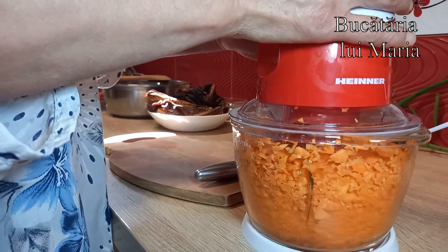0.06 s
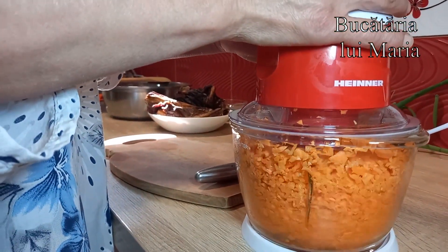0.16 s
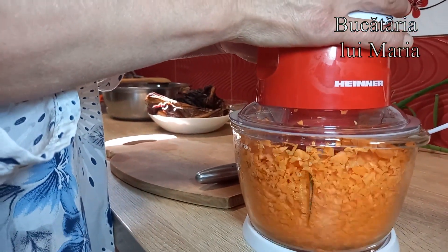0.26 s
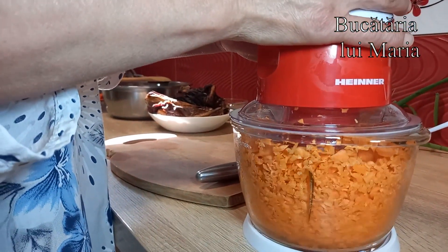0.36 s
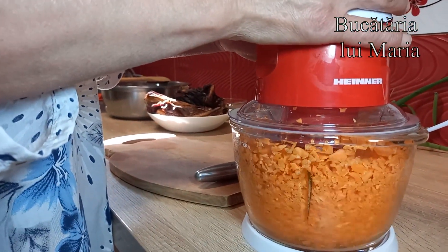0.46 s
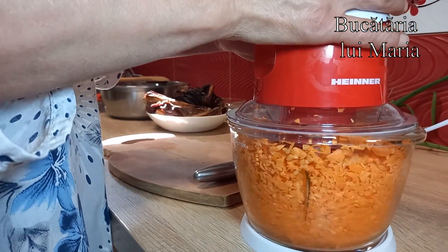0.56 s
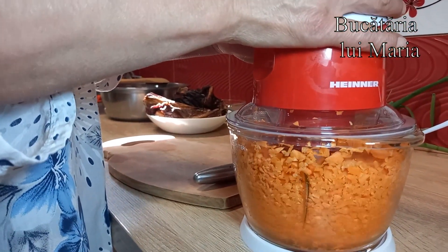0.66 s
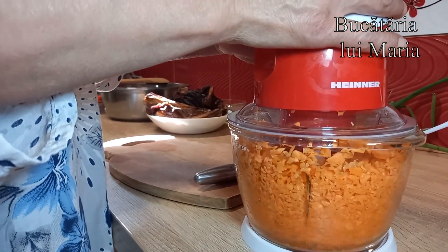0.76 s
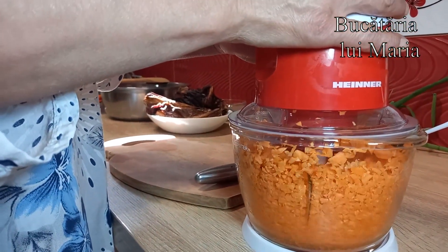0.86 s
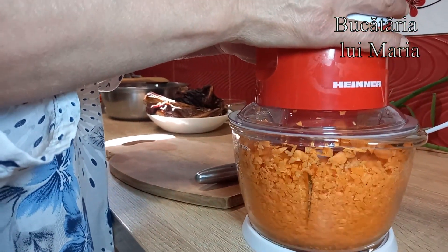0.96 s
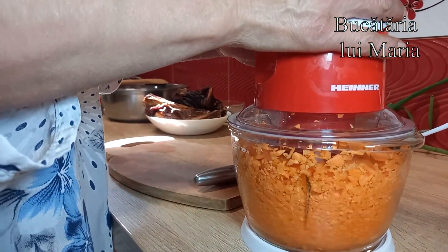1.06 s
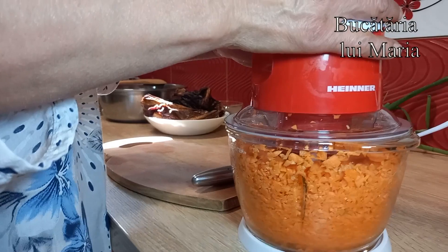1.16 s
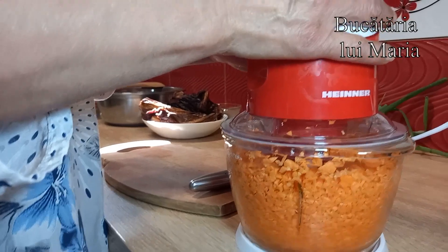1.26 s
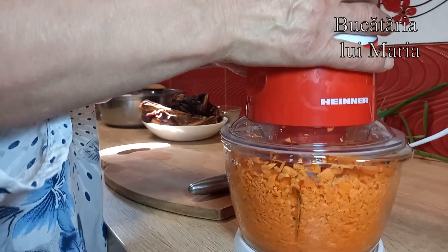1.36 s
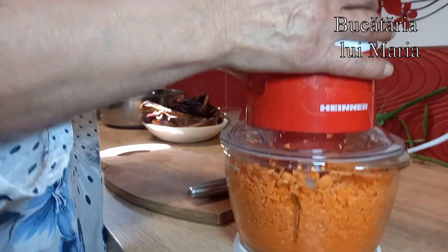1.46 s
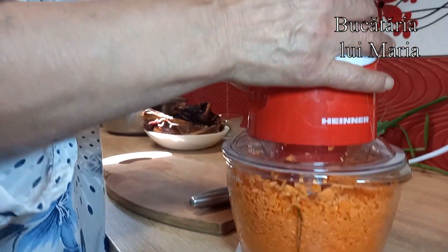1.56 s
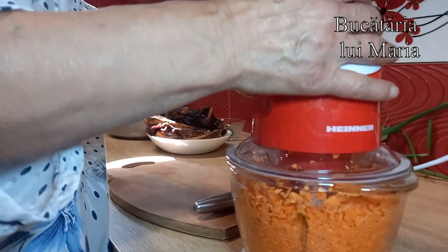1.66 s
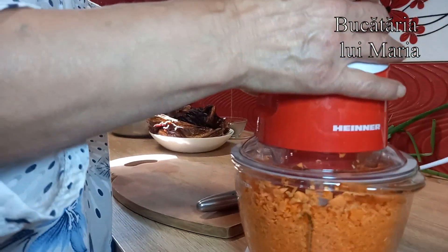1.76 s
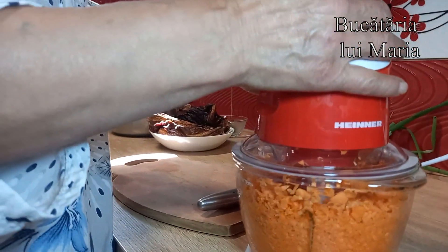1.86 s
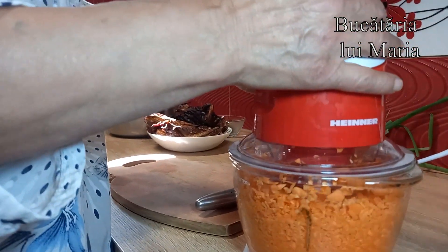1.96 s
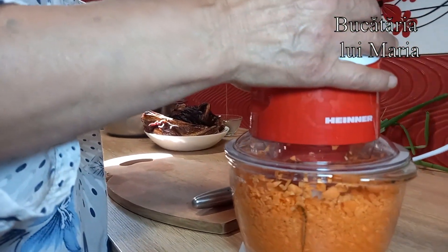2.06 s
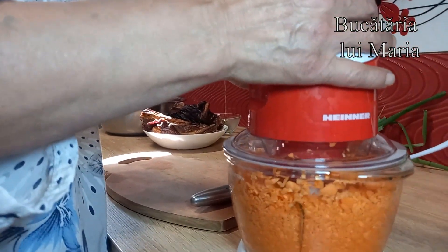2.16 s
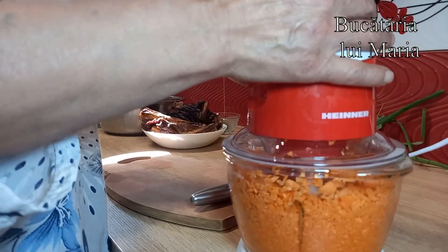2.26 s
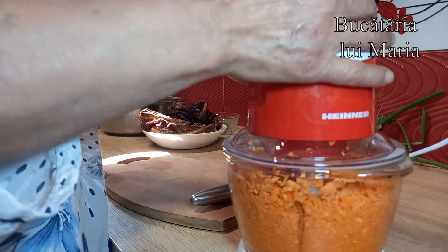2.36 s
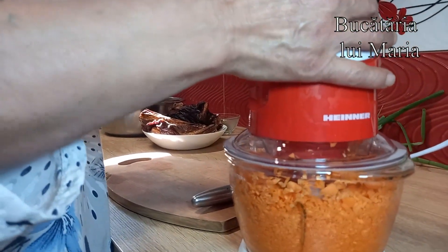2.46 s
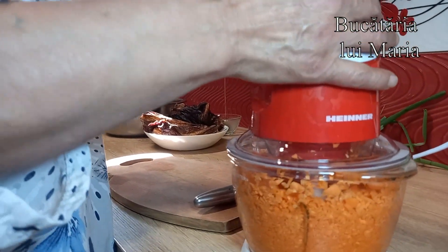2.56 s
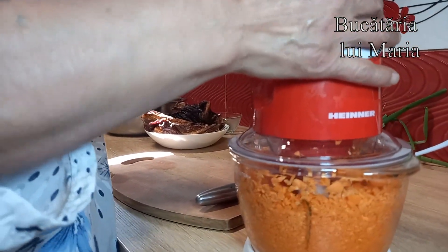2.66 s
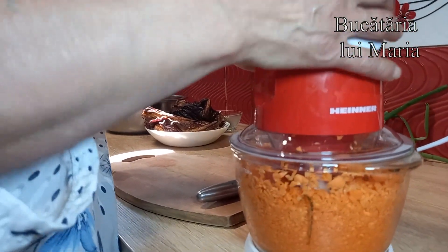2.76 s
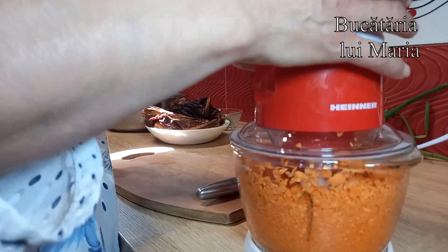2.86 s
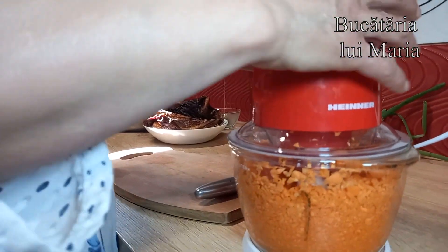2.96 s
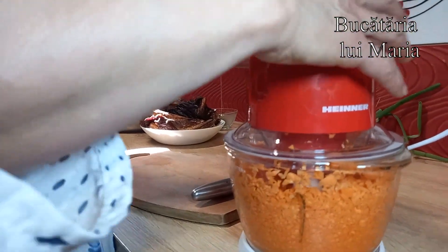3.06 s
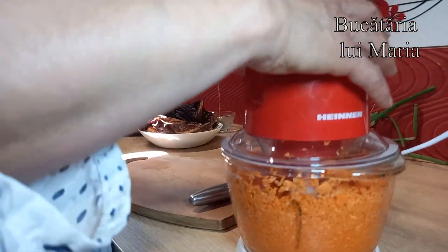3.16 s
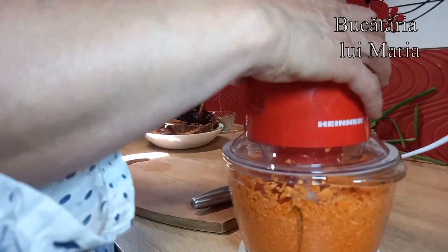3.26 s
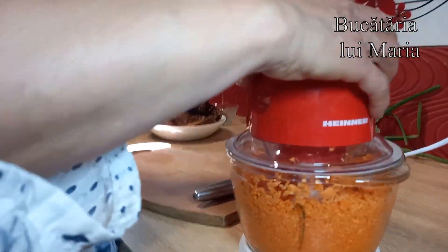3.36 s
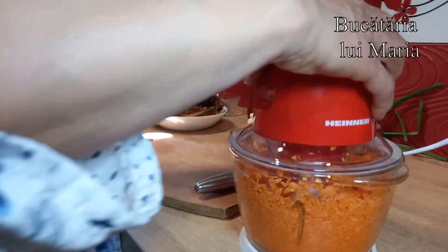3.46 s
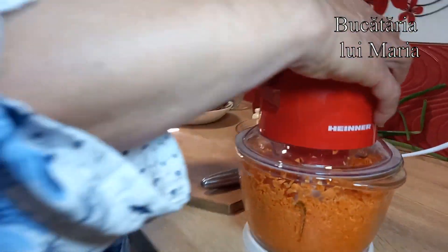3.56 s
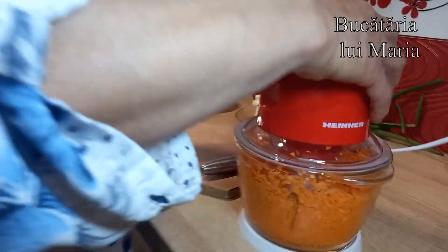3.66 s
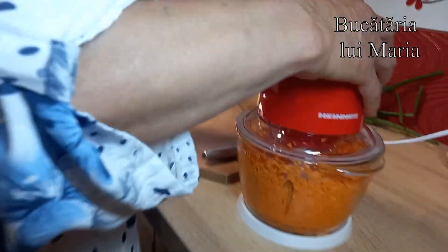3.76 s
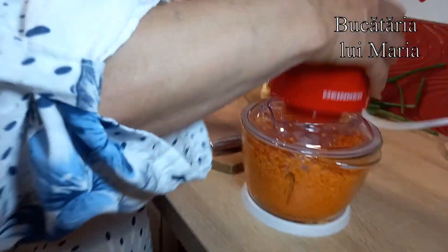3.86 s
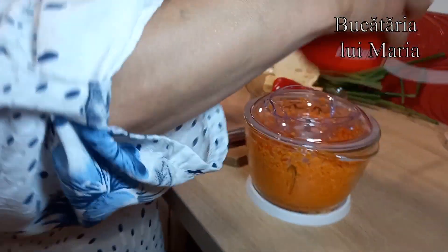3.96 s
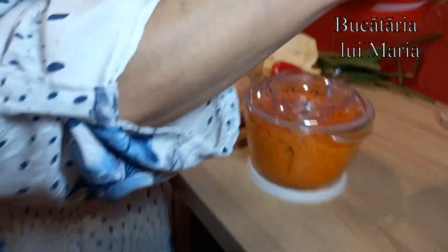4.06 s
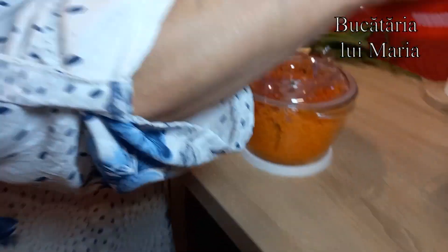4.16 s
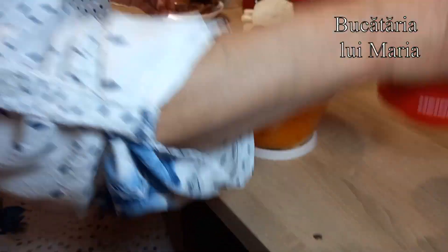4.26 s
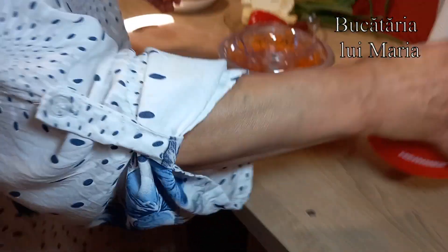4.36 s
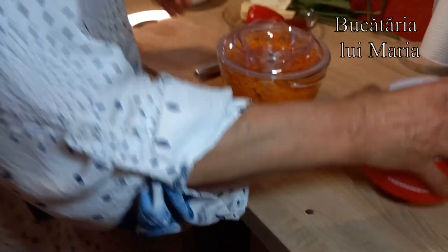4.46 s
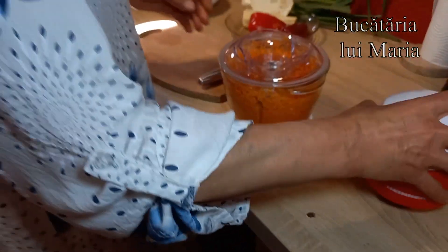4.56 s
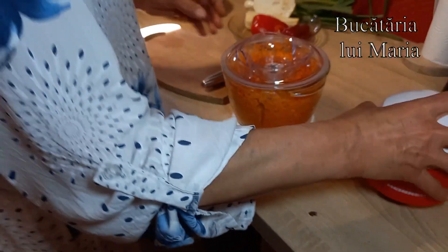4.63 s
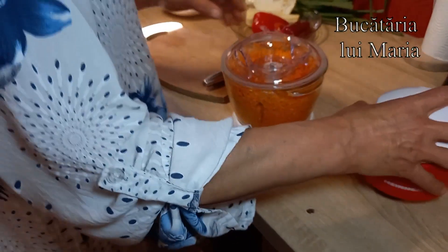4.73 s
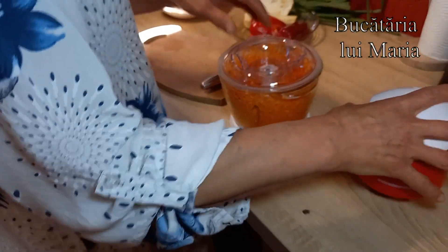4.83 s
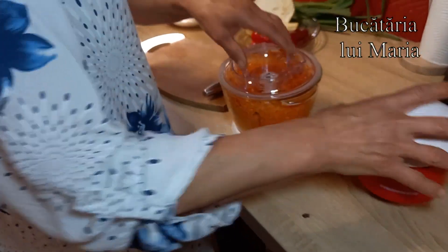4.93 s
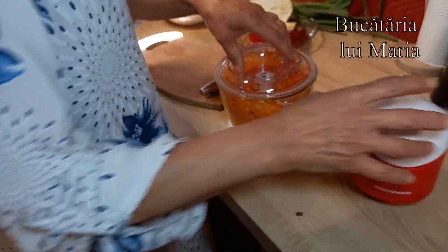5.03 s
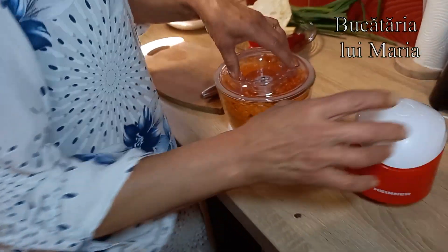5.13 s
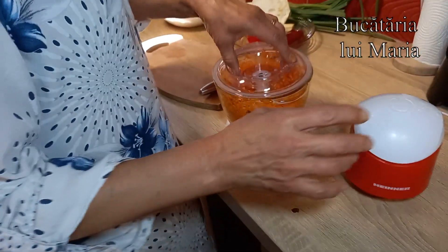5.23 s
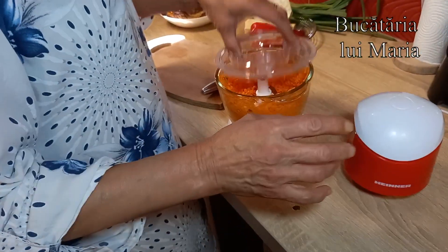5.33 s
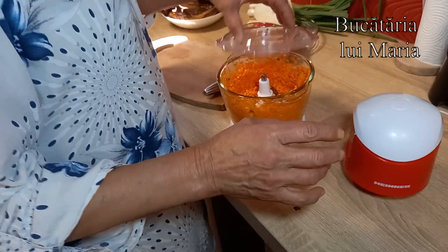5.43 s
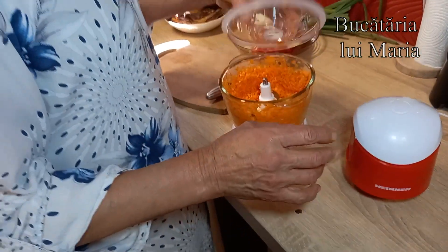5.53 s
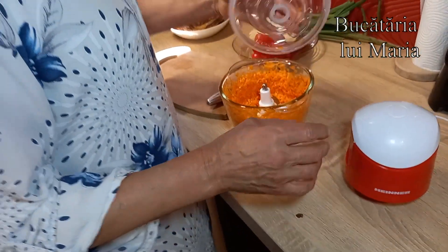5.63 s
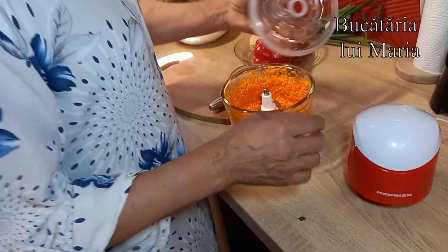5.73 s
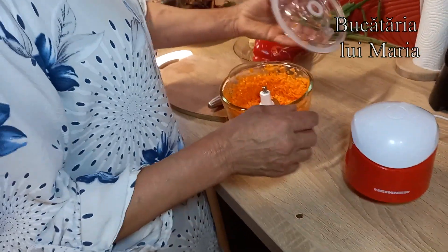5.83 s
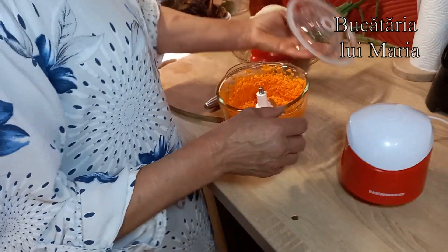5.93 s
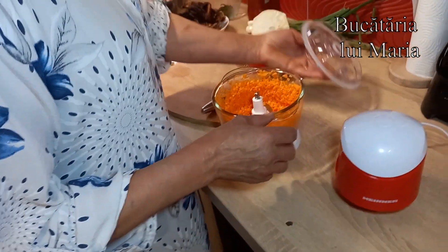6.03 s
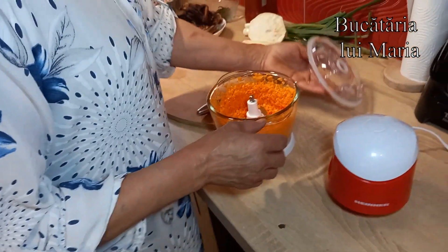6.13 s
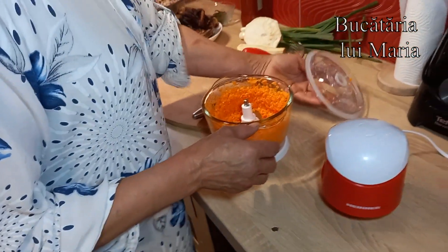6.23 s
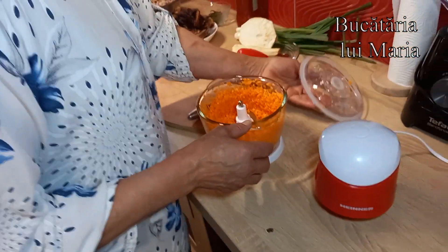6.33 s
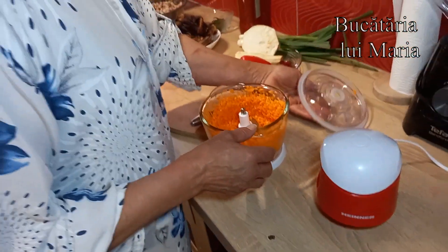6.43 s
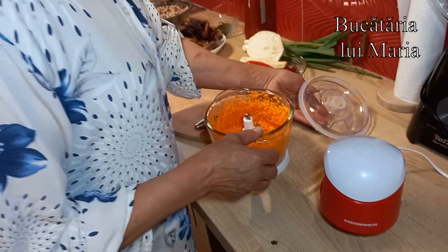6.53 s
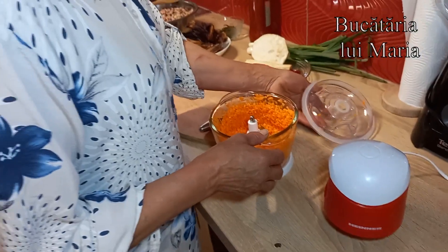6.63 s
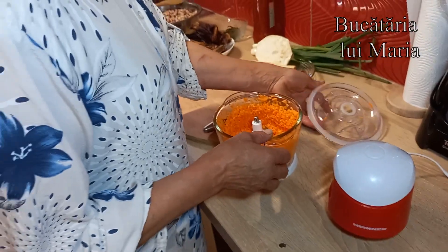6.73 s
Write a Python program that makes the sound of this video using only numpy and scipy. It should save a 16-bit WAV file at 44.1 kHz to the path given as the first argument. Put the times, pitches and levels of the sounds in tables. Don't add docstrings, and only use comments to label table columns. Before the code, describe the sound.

An electric chopper grinds carrot loudly in a glass bowl, snaps off and runs down, then its motor head clinks glass and the lid rattles.

```python
import sys
import numpy as np
from scipy import signal
from scipy.fft import rfft, irfft, next_fast_len
from scipy.io import wavfile
from scipy.ndimage import uniform_filter1d

SR = 44100
rng = np.random.default_rng(int(sys.argv[2]) if len(sys.argv) > 2 else 0)


def generate_wav(sig):
    pcm = np.round(np.clip(np.atleast_2d(sig).T, -1, 1) * 32767).astype(np.int16)
    wavfile.write(sys.argv[1], SR, pcm)


def decibels_to_gain(level_db):
    exponent = np.asarray(level_db, float) / 20
    return 10 ** exponent


N = 299439

SNAP_S, COAST_END_S = 2.4108, 2.7
HUM_HZ = 100.55
# (frequency [Hz], density [dB/Hz])
CHUNK_COLOUR = [(290, -29), (500, 3.5), (2680, -10), (3530, -13.5), (4080, -21.5), (5370, -15),
                (15900, -23)]
# (frequency [Hz], density [dB/Hz])
STOP_SPECTRUM = [(35, -46), (60, -20), (207, -0.5), (249, -5), (388, 0), (457, -9.5), (782, -15.5),
                 (1220, -7), (1990, -19.5), (2800, -21.5), (3400, -17), (5070, -15.5), (5690, -17),
                 (6700, -19.5), (8670, -23), (15900, -39)]
# (frequency [Hz], width [Hz], level [dB])
STOP_BUMPS = [(370, 160, 3), (1200, 270, 4), (1370, 55, 5), (3467, 240, 7), (3800, 95, 7), (4250, 120, 6.5),
              (4620, 150, 8), (5730, 240, 8), (6460, 150, 5)]


def evened(x):
    return x / np.sqrt(np.mean(x ** 2) + 1e-20)


def wander(count, span):
    return evened(uniform_filter1d(rng.standard_normal(count), span))


def drawn(t, points):
    return np.interp(t, *np.transpose(points))


def add(mix, s, sound):
    part = mix[round(s * SR):][:len(sound)]
    part += sound[:len(part)]


def coloured(x, points, peaks=(), lo_hz=0, hi_hz=SR):
    size = next_fast_len(len(x), True)
    hz = np.fft.rfftfreq(size, 1 / SR) + 1
    points_hz, points_db = np.transpose(points)
    db = np.interp(np.log(hz), np.log(points_hz), points_db)
    for f, width, up_db in peaks:
        db = db + up_db / (1 + (2 * (hz - f) / width) ** 2)
    edges = np.sqrt(1 / (1 + (hz / hi_hz) ** 20) - 1 / (1 + (hz / (lo_hz + 1)) ** 20))
    return evened(irfft(rfft(x, size) * decibels_to_gain(db) * edges, size)[:len(x)])


def layered(drive, points, peaks, cuts_hz, levels_db):
    bands = zip(cuts_hz, cuts_hz[1:], levels_db)
    return sum(decibels_to_gain(db) * coloured(drive, points, peaks, lo, hi) for lo, hi, db in bands)


def wavering(turns, width_hz):
    r = np.exp(-np.pi * width_hz / SR)
    a, b = signal.lfilter([1], [1, -2 * r, r * r], rng.standard_normal((2, len(turns))))
    return evened(a * np.cos(2 * np.pi * turns) + b * np.sin(2 * np.pi * turns))


def thump(hz, t60):
    t = np.arange(round(t60 * SR)) / SR
    return -decibels_to_gain(-60 * t / t60) * np.sin(2 * np.pi * hz * np.sqrt(t * (t + 0.0073)))


def blows(mix, thing, hits, ring_db, tail_db, tail_t60_s, flutter, flutter_hz, crack_db):
    modes, colour = thing
    t = np.arange(round(.22 * SR)) / SR
    for s, db in hits:
        ring = 0
        for hz, mode_db, t60 in modes:
            walls = flutter * wavering(hz * t, flutter_hz) * (1 - np.exp(-t / 0.012))
            ring = ring + decibels_to_gain(mode_db - 60 * t / min(t60, .5)) * (np.sin(2 * np.pi * hz * t) + walls)
        noise = coloured(rng.standard_normal(len(t)), colour)
        dull = uniform_filter1d(noise, size=9)
        bright = noise - dull
        tail = dull * decibels_to_gain(-60 * t / tail_t60_s) + bright * decibels_to_gain(-90 * t / tail_t60_s)
        crack = np.exp(-t / .0016) * (0.37 * dull + 1.17 * bright)
        sound = decibels_to_gain(ring_db) * ring + decibels_to_gain(crack_db) * crack
        sound += decibels_to_gain(tail_db) * (1 - np.exp(-t / 0.0026)) * tail
        add(mix, s, decibels_to_gain(db) * sound * np.minimum(t / 0.00062, 1))


def room(mix):
    # (frequency [Hz], density [dB/Hz])
    air_colour = [(20, -34), (50, -6.5), (94, -7.5), (125, -13), (350, -24), (530, -27.5), (3000, -35.5),
                  (4200, -23.5), (5000, -18), (8800, -18.5), (10000, -22), (10800, -28), (15000, -33),
                  (15900, -36)]
    # (middle [s], half length [s], rise [dB])
    rustles = [(2.781, 0.054, 4.5), (2.899, 0.067, 6.5), (3.082, 0.052, 6.5), (3.285, 0.075, 7),
               (3.472, 0.031, 5.5), (3.679, .16, 9), (4.549, .2, 1), (4.903, 0.11, 2), (5.12, 0.13, 6.5),
               (6.1, .15, 7), (6.453, .08, 5.5), (6.752, 0.17, 3)]
    t = np.arange(2.6, N / SR, 1 / SR)
    rustle_db = sum(db * np.exp(-((t - s) / half) ** 2) for s, half, db in rustles)
    levels_db = -77 + 0.81 * rustle_db, -79 + rustle_db, -73 + 0.9 * rustle_db
    noise = rng.standard_normal(len(t)) * decibels_to_gain(1.3 * wander(len(t), 900))
    air = layered(noise, air_colour, (), (0, 300, 3500, SR), levels_db)
    air += decibels_to_gain(-73) * np.sin(np.pi * HUM_HZ * t)
    add(mix, t[0], air * np.minimum((t - t[0]) / 0.072, 1))


def finger_ticks(mix):
    # (time [s], level [dB], ring [Hz], second ring [Hz])
    ticks = [(2.73, -53, 3900, 3800), (2.848, -51, 3790, 1220), (2.9195, -48, 4300, 1140),
             (3.303, -52, 6500, 500), (3.355, -49, 5400, 290), (3.4563, -50, 5000, 220),
             (3.464, -46, 6570, 520), (3.492, -54, 1250, 1250), (3.582, -45, 4500, 320),
             (3.666, -44, 4500, 1300), (3.69, -50.5, 1330, 1330), (3.3, -53, 1200, 1300),
             (3.73, -53, 1200, 1200), (3.7535, -41, 6200, 4700), (4.777, -48, 4883, 310),
             (5.042, -53, 3900, 3400), (5.163, -55, 4000, 4600), (5.216, -44, 5100, 1450),
             (5.74, -50.5, 4400, 4300), (6.092, -54, 4200, 4200), (6.2, -46.5, 3000, 5000),
             (6.124, -54, 3000, 3000), (6.1395, -49, 5300, 4000), (6.144, -52, 7000, 7000),
             (6.471, -52, 6500, 5000)]
    t, t60 = np.arange(2500) / SR, 0.076
    for s, db, hz, low_hz in ticks:
        click = np.diff(uniform_filter1d(rng.standard_normal(len(t) + 1), size=5)) * np.exp(-t / 0.0025)
        high = wavering(hz * t, 1800) * (np.exp(-t / 0.002) + decibels_to_gain(-12.5 - 60 * t / t60))
        low = decibels_to_gain(-5.5 - 60 * t / t60) * wavering(low_hz * t, 296)
        add(mix, s, decibels_to_gain(db - 12.0) * (click + high + low))


def seal_pops(mix):
    # (time [s], level [dB], push or pull [sign])
    pops = [(3.445, -55, 1), (3.455, -53, -1), (3.4645, -51, -1), (5.9549, -46, 0.98), (5.9562, -52, -1),
            (5.967, -49, 1), (5.9727, -49, -1), (5.9875, -45, 1), (5.991, -46.5, 0.98), (5.9991, -45.5, -1),
            (6.0, -49, 1), (6.0245, -46, -1), (6.031, -50, 0.99), (6.0332, -44, -1), (6.0475, -45, 0.98),
            (6.0585, -45.5, -1), (6.064, -44.5, 1), (6.065, -45, -1), (6.071, -43, 1), (6.0738, -44, -1),
            (6.195, -49, 0.99), (6.627, -58, 1), (6.665, -57, -1), (6.682, -56, 1)]
    t = np.arange(1000) / SR
    for s, db, sign in pops:
        pop_s = 0.00039 * np.exp(0.2 * rng.standard_normal())
        u = t / pop_s
        push = (1 - u / 3) * np.exp(-u / 2.45) * np.minimum(t / .00003, 1)
        add(mix, s, sign * decibels_to_gain(db + 2) * push)
        add(mix, s, decibels_to_gain(db) * 0.54 * rng.standard_normal(100) * np.exp(-t[:100] / 0.00031))


def lid_catch(mix):
    # (frequency [Hz], density [dB/Hz])
    plastic = ([(4720, -1.5, 0.035), (413, -5, 0.062), (1450, -9, 0.036)], [(120, -50), (200, -22),
                (424, 0), (834, -33), (1470, -10), (2900, -13), (4930, -1), (6030, -18), (15900, -34)])
    # (time [s], level [dB])
    hits = [(3.78, -47), (3.7902, -40.5), (3.815, -54)]
    blows(mix, plastic, hits, ring_db=-6, tail_db=-5.5, tail_t60_s=0.05,
          flutter=1.5, flutter_hz=60, crack_db=-2.5)


def lid_tab(mix):
    # (frequency [Hz], density [dB/Hz])
    plastic = ([(4860, 1.5, 0.047), (3140, -15, 0.15), (1720, -13, 0.12), (7000, 1, .02)], [(180, -55),
                (300, -27), (1250, -34), (1750, -14), (2240, -22.5), (4970, 2), (6170, -11), (9660, -15),
                (15900, -55)])
    # (time [s], level [dB])
    hits = [(5.0706, -34)]
    blows(mix, plastic, hits, ring_db=-16, tail_db=-23, tail_t60_s=0.23,
          flutter=1.8, flutter_hz=199, crack_db=2)


def glass_clink(mix):
    # (frequency [Hz], density [dB/Hz])
    glassware = ([(2640, -8, 0.24), (2940, -7, 0.18), (3575, -15.5, 0.2), (3760, -10.5, 0.25),
                  (5588, -11, 0.15), (5044, -11, 0.2), (5841, -0.5, 0.16), (6300, -8, 0.08),
                  (4883, -12, .15), (8565, -11, 0.12), (7450, 0, 0.1), (8020, -5, 0.1), (9560, -6.5, 0.11),
                  (11600, -19, 0.12)], [(59, -44.5), (100, -23), (1170, -19), (2310, -40), (2620, -2.5),
                  (3840, -25.5), (4270, -9.5), (5740, 2), (6390, -18), (7730, -1.5), (15900, -30)])
    # (time [s], level [dB])
    hits = [
        (4.2479, -21),
        (4.2537, -20),
        (4.2676, -24.5),
        (4.29, -34),
    ]
    blows(mix, glassware, hits, ring_db=-9.5, tail_db=-20, tail_t60_s=0.22,
          flutter=.45, flutter_hz=25, crack_db=-3)


def head_base(mix):
    # (frequency [Hz], density [dB/Hz])
    base = ([(84.6, -11, 0.13), (870, -8, 0.072), (2600, -15, 0.25), (1050, -13.5, .2), (5800, 1, 0.043)],
             [(35, -44), (60, -11), (407, -10.5), (900, -4.5), (1470, -8), (1940, -20.5), (2400, -7.5),
             (2960, -1.5), (4300, -3.5), (8080, -8), (15900, -41)])
    # (time [s], level [dB])
    hits = [(4.3877, -25.5)]
    blows(mix, base, hits, ring_db=-14, tail_db=-14.5, tail_t60_s=0.21,
          flutter=0.5, flutter_hz=59, crack_db=1)


def table_knock(mix):
    # (frequency [Hz], density [dB/Hz])
    board = ([(151.6, -5.5, 0.22), (81.5, -8.5, 0.3), (109, -7.5, 0.15), (310, -11.5, 0.15),
              (4520, 7, 0.024), (6030, 3, 0.026), (3680, -9.5, 0.068)], [(120, -38), (200, -10.5),
              (240, -3), (316, -4.5), (695, -17), (747, -11), (1120, -11), (1470, -24), (2690, -13),
              (3290, -19.5), (4660, -11.5), (8530, -19.5), (15900, -61)])
    # (time [s], level [dB])
    hits = [
        (4.553, -27),
        (4.6303, -38.5),
    ]
    blows(mix, board, hits, ring_db=-6.5, tail_db=-14, tail_t60_s=0.21,
          flutter=0.83, flutter_hz=39.5, crack_db=0.5)


def lid_rattle(mix):
    # (frequency [Hz], density [dB/Hz])
    disc = ([(214.5, -12, 0.2), (631, -6.5, 0.24), (925, -23, 0.078), (1156, -6.5, 0.2), (1260, -10, 0.2),
             (1424, -10.5, 0.2), (1870, -4.5, 0.074), (3150, -1.5, 0.036), (3510, 2, 0.027),
             (4830, -3.5, 0.035)], [(59, -56), (100, -18), (210, -13), (372, -24), (620, -6.5),
             (1150, -3.5), (1580, -13.5), (1870, -11.5), (2570, -16.5), (3170, -17.5), (4090, -19),
             (9760, -28), (15900, -46)])
    # (time [s], level [dB])
    hits = [(6.2095, -24.5), (6.2496, -25.5), (6.2777, -27), (6.297, -29), (6.3129, -33), (6.3262, -37),
            (6.3376, -37), (6.348, -37), (6.358, -39.5), (6.367, -42.5), (6.376, -41), (6.387, -41),
            (6.397, -45), (6.408, -47)]
    blows(mix, disc, hits, ring_db=-11, tail_db=-13, tail_t60_s=0.19,
          flutter=.45, flutter_hz=40, crack_db=2.5)


def rim_knock(mix):
    # (frequency [Hz], density [dB/Hz])
    edge = ([(318, -5.5, 0.028), (632, -22.5, 5.0), (862, -0.5, 0.086), (1480, -18, 0.18),
             (2100, -32.5, 0.32)], [(59, -48), (100, -11), (372, -14.5), (620, 6), (734, -13), (852, 4.5),
             (1200, -19), (1710, -7), (2570, -22.5), (3920, -18.5), (4360, -24), (5510, -24), (15900, -56)])
    # (time [s], level [dB])
    hits = [(6.719, -44), (6.735, -45.5), (6.751, -55), (6.7732, -30), (6.786, -32)]
    blows(mix, edge, hits, ring_db=-10, tail_db=-8, tail_t60_s=0.14,
          flutter=1, flutter_hz=37, crack_db=2)


def button_snap(mix):
    t = np.arange(60) / SR
    snap = np.sin(2 * np.pi * 4700 * t) * (t < .00062) * (0.67 + .5 * np.cos(2 * np.pi * 2600 * t))
    add(mix, SNAP_S, decibels_to_gain(-2.5) * snap)
    t = np.arange(4000) / SR
    swing = 2 * np.pi * 70 * t + 1.7 * (1 - np.exp(-t / 0.00081))
    decay = 0.87 * np.exp(-t / 0.0016) + 0.21 * np.exp(-t / 0.012)
    add(mix, SNAP_S + .0006, -decibels_to_gain(-1.5) * np.cos(swing) * decay)


def clutch(mix):
    # (time [s], level [dB], t60 [s])
    clacks = [(2.418, -19.5, .03), (2.425, -18, .03), (2.4346, -4, .012), (2.441, -14, 0.035),
              (2.463, -19.5, .03), (2.488, -21, 0.025)]
    t = np.arange(3000) / SR
    for s, db, t60 in clacks:
        clack = coloured(rng.standard_normal(3000), STOP_SPECTRUM, STOP_BUMPS, 500)
        add(mix, s, decibels_to_gain(db - 8.5 - 60 * t / t60) * clack)


def run_down(mix):
    start_s, halt_s, quiet_s = 2.432, 2.641, 2.76
    t = np.arange(start_s, quiet_s, 1 / SR)
    since = t - start_s
    halt_db = -260 * 0.015 * np.logaddexp(0, (t - halt_s) / 0.015)
    kick = np.exp(-since / 0.011)
    # level [dB], fall [dB/s], kick [dB]
    bands = (-33, 62, 4.5), (-28, 125, 5), (-31.5, 100.5, 9.5)
    levels_db = [db - fall * since + kick_db * kick + halt_db for db, fall, kick_db in bands]
    noise = rng.standard_normal(len(t)) * decibels_to_gain(1.5 * wander(len(t), 200))
    rattle = layered(noise, STOP_SPECTRUM, STOP_BUMPS, (0, 700, 3000, SR), levels_db)
    add(mix, start_s, rattle * signal.windows.tukey(len(t), .03))
    # (time [s], length [s], frequency [Hz], level [dB])
    groan = (2.5, 0.04, 360.5, -48)
    s, length_s, hz, db = groan
    t = np.arange(round(length_s * SR)) / SR
    add(mix, s, decibels_to_gain(db) * np.sin(2 * np.pi * hz * t) * np.hanning(len(t)))


def bowl_thuds(mix):
    # (time [s], level [dB])
    jolts = [(.075, -25), (0.188, -18), (1.059, -18), (1.396, -18), (1.875, -11.5)]
    for s, db in jolts:
        add(mix, s, decibels_to_gain(db) * thump(78, 0.068))
    lumps_per_s, low_hz, high_hz = 40, 60, 418
    for when, pitch, size in rng.random((round(lumps_per_s * SNAP_S), 3)):
        hz = low_hz * (high_hz / low_hz) ** pitch
        add(mix, when * SNAP_S, decibels_to_gain(-33.5 + 9 * size) * thump(hz, .04))


def flung_pieces(mix):
    # (time [s], level [dB])
    chunks = [(0.063, -26), (0.085, -24), (0.182, -27), (0.507, -26.5), (1.167, -34), (1.243, -28),
              (1.41, -33), (1.7, -33), (1.724, -31.5), (1.821, -24), (1.875, -30.5), (1.9993, -32.5)]
    # (time [s], level [dB])
    spits = [(.739, -38), (1.018, -37), (1.3, -34), (1.4132, -34), (1.4596, -36), (1.485, -38),
             (1.545, -40), (1.5968, -32.5), (1.642, -38), (1.685, -39), (1.725, -36.5), (1.741, -37),
             (1.753, -38), (1.796, -37), (1.806, -39), (1.858, -38), (1.8756, -35), (1.945, -39),
             (1.996, -35)]
    for s, db in chunks:
        burst = coloured(rng.standard_normal(2048), CHUNK_COLOUR)[:round(.012 * SR)]
        add(mix, s, decibels_to_gain(db - 2) * burst * signal.windows.tukey(len(burst), .4))
    strays_per_s = 15
    strays = [(when * SNAP_S, -42 + 4 * size) for when, size in rng.random((round(strays_per_s * SNAP_S), 2))]
    for s, db in list(spits) + strays:
        spit = coloured(rng.standard_normal(1024), CHUNK_COLOUR, (), 7500)[:600]
        add(mix, s, decibels_to_gain(db - 4) * spit * np.exp(-np.arange(600) / (.005 * SR)))


def driven_hum(t):
    # (frequency [Hz], fuzz width [Hz], level [dB])
    humming = [
        (214.4, 14, -44),
        (408.2, 46, -43),
        (515.4, 55, -42.5),
        (8050, 60, -47),
    ]
    # (frequency [Hz], width [Hz], level [dB], start [s], end [s])
    gear_ring = (12050, 70, -58, .15, 1.45)
    hum = sum(decibels_to_gain(db) * wavering(hz * t, width) for hz, width, db in humming)
    hz, width, db, start, end = gear_ring
    return hum + decibels_to_gain(db) * wavering(hz * t, width) * np.clip(np.minimum(t - start, end - t) / .1, 0, 1)


def lid_song(t, throb):
    # (time [s], frequency [Hz])
    grip = [(0, 5500), (.2, 5450), (1.0, 5380), (1.3, 5300), (1.8, 5260), (2.1, 5330), (2.45, 5370)]
    turns = np.cumsum(drawn(t, grip) + 25 * wander(len(t), 700)) / SR
    tone = np.sin(2 * np.pi * turns) + .55 * wavering(turns, 40)
    return decibels_to_gain(-41 - 2.5 * abs(t - 1)) * (1 + throb) * tone


def rotor_whines(turns, throb, loaded_hz):
    # (multiple of the turns, fuzz width [Hz], level [dB])
    multiples = [(6.73, 60, -49.5), (11.16, 22, -47), (12.62, 20, -54.5), (13.97, 19, -53),
                 (22.96, 60, -45), (24.27, 90, -47), (27.23, 36, -44.5), (35.1, 61, -48), (36.7, 40, -43.5),
                 (38.8, 20, -49), (47.7, 76, -48), (52.8, 69, -52)]
    bars_db = -45 + 2.5 * (loaded_hz - 152.2)
    tones = decibels_to_gain(bars_db) * np.sin(2 * np.pi * 12 * turns)
    for k, width, db in multiples:
        whine = np.sin(2 * np.pi * k * turns) + 0.31 * wavering(k * turns, width)
        tones += decibels_to_gain(db) * (1 + throb) * whine
    return tones


def brush_roar(t, throb, effort_db, seat_db):
    # (frequency [Hz], density [dB/Hz])
    roar_colour = [(15, -47), (25, -13.5), (91, 0), (166, -2), (317, -2.5), (515, -4.5), (884, -15),
                   (1800, -13), (2100, -21), (3280, -25.5), (3450, -18), (5400, -13), (6010, -19),
                   (7460, -20), (8540, -26), (15900, -40)]
    # (frequency [Hz], width [Hz], level [dB])
    resonances = [(215, 27, 4), (405, 40, 4), (515, 60, 3), (1015, 80, 3), (3600, 250, 4), (4450, 200, 3),
                  (5300, 300, 3.5), (7380, 350, 6), (12050, 150, 4), (8800, 190, 1.5)]
    flurry = decibels_to_gain(0.44 * wander(len(t), 500))
    sparks = decibels_to_gain(2.2 * np.minimum(rng.exponential(1, len(t)), 3))
    drive = rng.standard_normal(len(t)) * sparks * (1 + throb) * flurry
    levels_db = -31.5 + effort_db + .15 * seat_db, -32.5 + effort_db, -30.5 + effort_db
    return decibels_to_gain(-1.0) * layered(drive, roar_colour, resonances, (0, 700, 3200, SR), levels_db)


def motor(mix):
    # (time [s], effort [dB])
    effort = [(0.0, 1.5), (0.3, 1), (0.9, .5), (1.17, 0), (1.4, 0), (1.52, -0.5), (1.86, -.5), (2.16, 0),
              (2.36, -0.5), (2.41, 0)]
    # (time [s], turns [Hz])
    rotor = [(0, 153), (.3, 152.2), (.55, 149.8), (.8, 151.7), (1.05, 152.3), (1.3, 151.1), (1.85, 151.4),
             (2.0, 153.8), (2.2, 154), (2.41, 154.8)]
    # (time [s], shake [dB])
    seat = [(0, -33.5), (.116, -41.5), (.2, -34), (.29, -27.5), (.335, -37), (.4, -32.5), (.56, -30.5),
            (.75, -36.5), (.864, -28), (1.03, -33), (1.08, -41.5), (1.44, -40.5), (1.5, -48), (1.68, -40),
            (1.745, -33), (2.1, -35.5), (2.2, -40), (2.28, -34)]
    # fixed beat near 102 Hz, once a turn, twice a turn
    depths = [0.085, 0.042, 0.1]
    t = np.arange(0, COAST_END_S, 1 / SR)
    seat_db = drawn(t, seat) + 35
    loaded_hz = drawn(t, rotor)
    coast_hz_per_s = 295
    speed_hz = loaded_hz - coast_hz_per_s * np.maximum(t - SNAP_S, 0)
    hunting = .0007 * wander(len(t), 900)
    turns = np.cumsum(speed_hz * (1 + hunting)) / SR
    phases = 101.9 * t, turns, 2 * turns
    throb = sum(d * np.cos(2 * np.pi * p) for d, p in zip(depths, phases))

    roar = brush_roar(t, throb, drawn(t, effort), seat_db)
    roar += decibels_to_gain(-33.5 + .35 * seat_db) * np.sin(2 * np.pi * HUM_HZ * t)
    roar += driven_hum(t) + lid_song(t, throb)
    roar += decibels_to_gain(-32.5 + seat_db) * (np.sin(2 * np.pi * turns) + .17 * wavering(turns, 15))
    tones = rotor_whines(turns, throb, loaded_hz)

    roar_db = np.interp(t, [SNAP_S, SNAP_S + 0.0038, 2.435, 2.45], [-0.5, -5.0, -6.0, -68])
    tones_db = np.interp(t, [SNAP_S, SNAP_S + .003, 2.55, COAST_END_S], [2.5, -2.0, -9, -36])
    add(mix, 0, roar * decibels_to_gain(roar_db) + tones * decibels_to_gain(tones_db))


def scene():
    mix = np.zeros(N)
    for source in (room, finger_ticks, seal_pops, lid_catch, lid_tab, glass_clink, head_base, table_knock,
                   lid_rattle, rim_knock, button_snap, clutch, run_down, bowl_thuds, flung_pieces, motor):
        source(mix)
    return np.array([mix, mix])


def low_pass(x):
    return signal.sosfilt(signal.butter(12, 15790, fs=SR, output="sos"), x)


def record(dry):
    # (frequency [Hz], density [dB/Hz])
    hiss_colour = [(30, -14), (600, -9), (1500, -26.5), (3500, -26), (6000, -3.5), (9800, -0.5),
                   (10500, -9.5), (16000, -8.5)]
    side = decibels_to_gain(-82) * coloured(rng.standard_normal(N), hiss_colour)
    dry = signal.lfilter(*signal.butter(2, 32, "high", fs=SR), dry)
    side = side + decibels_to_gain(-42) * dry[0]
    return low_pass(np.clip(dry + np.array([side, -side]), -1, 1))


dry = scene()
out = record(dry)
generate_wav(out)
```